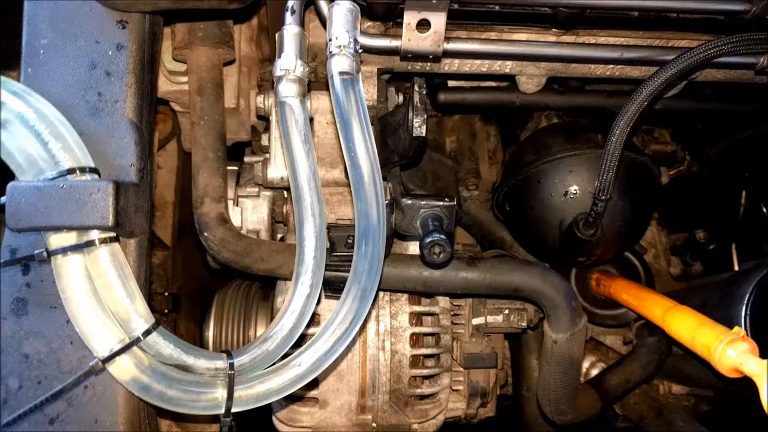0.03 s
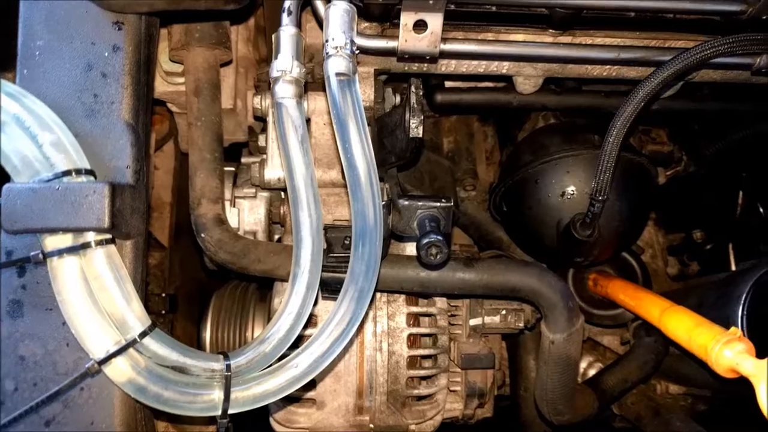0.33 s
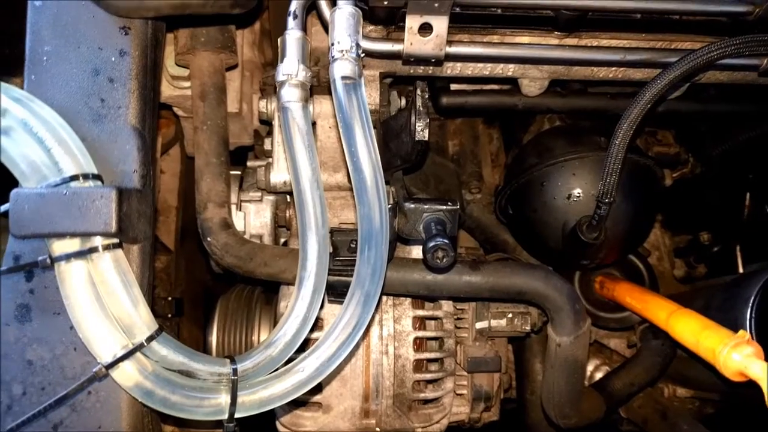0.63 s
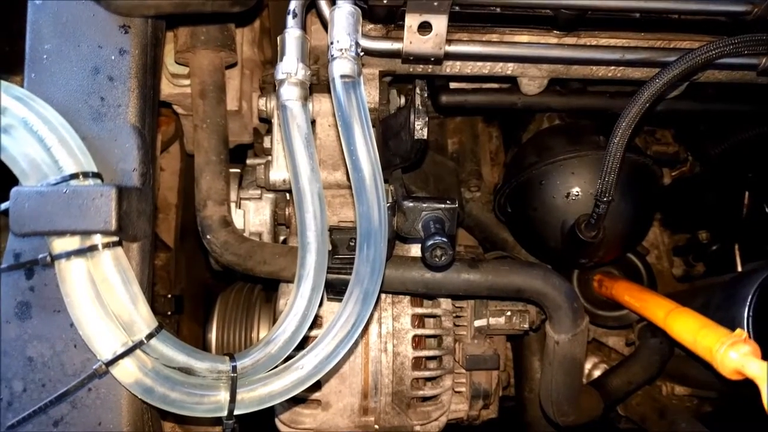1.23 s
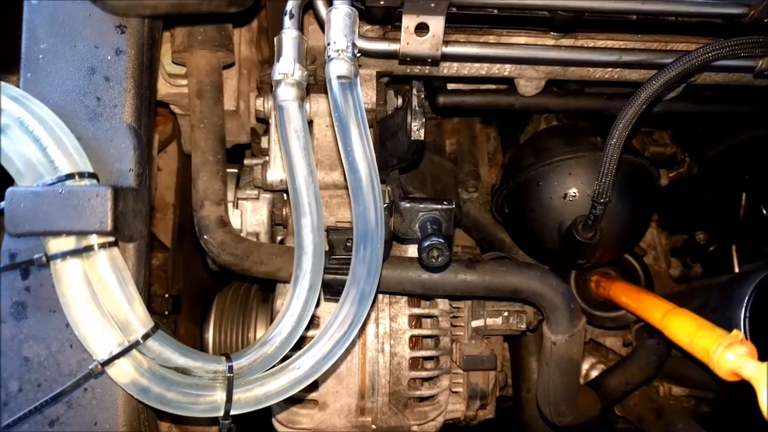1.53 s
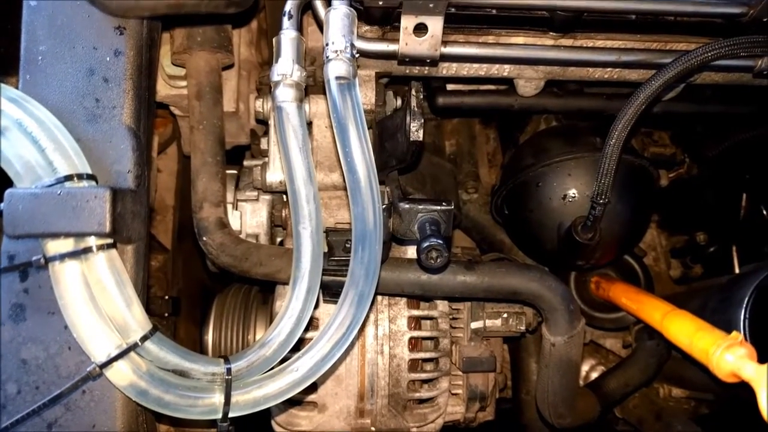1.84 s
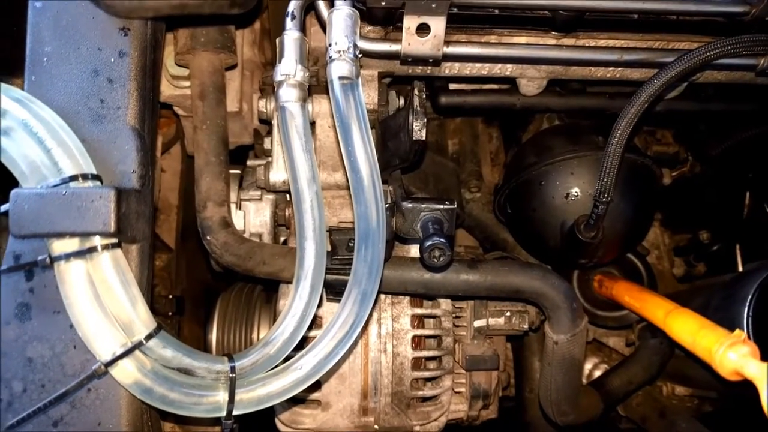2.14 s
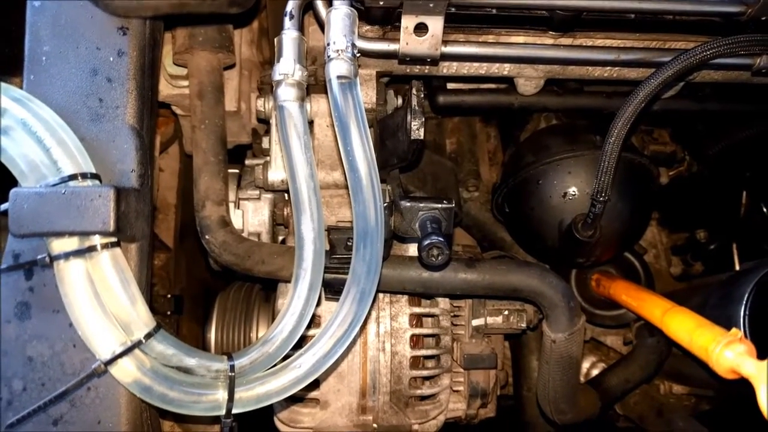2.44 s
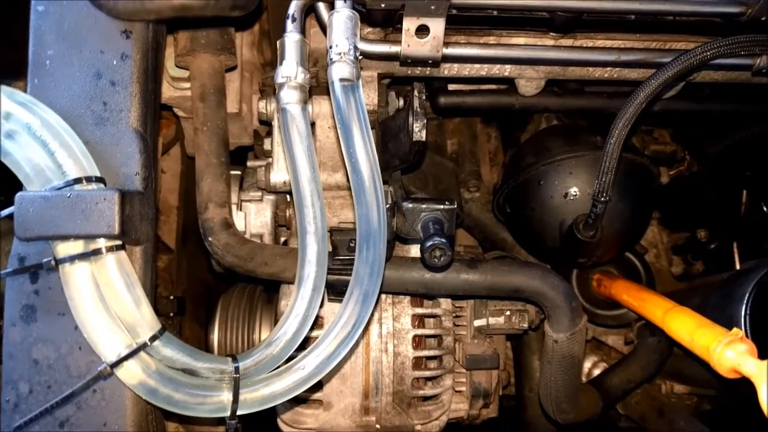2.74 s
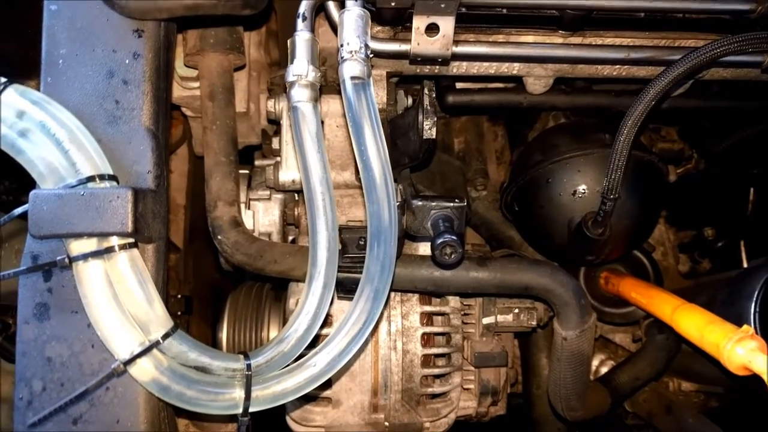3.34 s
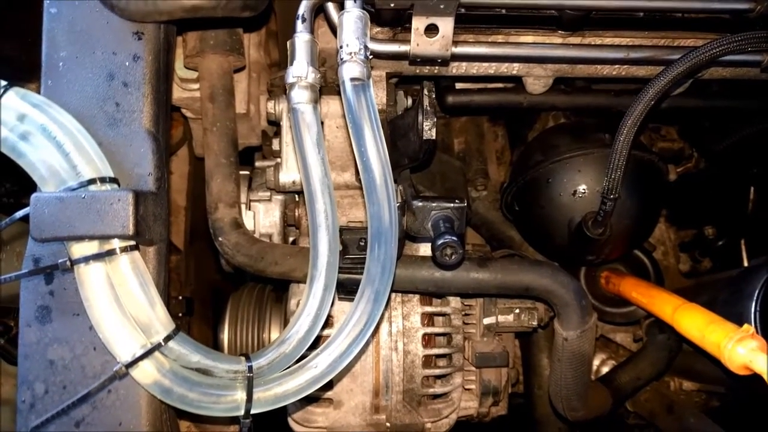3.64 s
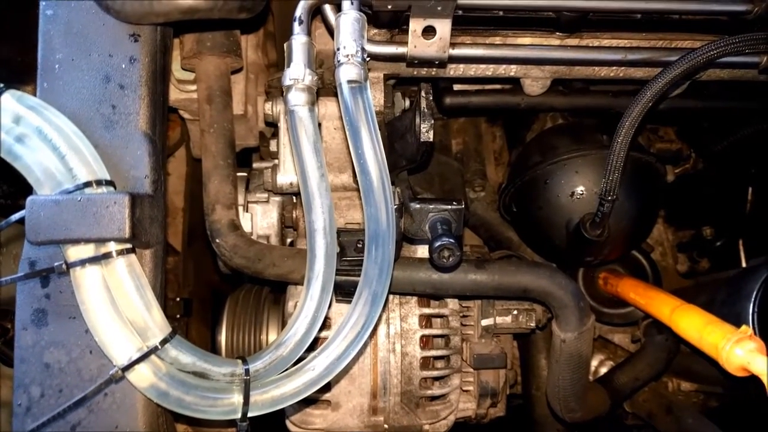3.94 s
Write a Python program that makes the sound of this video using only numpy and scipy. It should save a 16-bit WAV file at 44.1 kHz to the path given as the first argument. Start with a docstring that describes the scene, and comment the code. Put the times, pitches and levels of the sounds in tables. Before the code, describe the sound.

A diesel car engine idles, heard from close above the open engine bay. It fades in between about 0.15 and 0.5 seconds, then holds the same speed until the end at around 4 seconds. Hard, bright metallic knocks repeat evenly, about thirty a second, with fine gear and valve clatter and light hiss between them. Underneath run a low rumble and the soft, rhythmic gulping of the air intake.

```python
"""Hard diesel knock: a four-cylinder engine idles, heard from close above the open engine bay.
Each cylinder fires with its own knock, ringing through the block and steel parts near 7 kHz.
Gears and valves clatter in between; below lie piston shake, a thud per firing and the gulping intake.
The sound fades in and the loudest knocks overload the microphone."""
import sys
import numpy as np
from scipy import signal
from scipy.fft import rfft, irfft
from scipy.io import wavfile
from scipy.ndimage import uniform_filter1d

SR = 44100
rng = np.random.default_rng(int(sys.argv[2]) if len(sys.argv) > 2 else 0)


def persist_wave(psi):
    """Save psi, clipped to +-1, as 16-bit WAV."""
    counts = np.round(np.clip(psi, -1, 1) * 32767).astype(np.int16)
    wavfile.write(sys.argv[1], SR, np.atleast_2d(counts).T)


N = 176400
TIME = np.arange(N) / SR
FIRING_S, FIRINGS_PER_CYCLE = .0331845, 4
SWELL_CENTRE_S = .05


def knocks(times):
    """The cylinders fire in turn, each heard over its own path."""
    # in firing order: level/dB, slap delay/s, steel slap over ignition/dB, steel decay/s, crack/dB
    cylinders = [(-18, 0.0018, 10, 0.0035, -21), (-18, 0.00282, 8.5, 0.0052, -17),
                 (-17, 0.00245, -1.5, 0.0042, -13), (-20, 0.0012, -0.5, 0.0071, -9.5)]
    # resonances and hollows per path: f/Hz, width/Hz, gain/dB
    paths = [[(1214, 50, 6), (1410, 44, -9), (2310, 46, 4.5), (2440, 54, -5.4), (2648, 74, -5),
              (3090, 56, -1), (3466, 42, 7), (3940, 44, 5.5), (4177, 68, -6), (5420, 98, -9),
              (5792, 120, 9), (6740, 69, -4)], [(446, 56, -4), (1080, 150, 1), (1454, 91, 5), (1800, 86, -5.5), (2043, 36, 7),
                              (2100, 41, -11), (2330, 110, 5), (2660, 57, -6.1), (3143, 320, -6),
                              (3860, 45, 6), (4000, 46, -5), (5900, 50, 8)], [(610, 28, 6.5), (746, 50, -10.5), (1030, 39, -9),
                                              (2170, 43, -9), (2320, 65, 7), (2760, 140, 1), (3107, 54, 7),
                                              (3860, 91, -6.9), (4293, 52, 10), (4650, 47, 9.5),
                                              (5357, 58, 8), (6354, 270, 7)], [(432, 23, 5), (1270, 41, -3.6),
                                                              (1500, 74, 3.0), (1690, 46, -9),
                                                              (2440, 91, -7.2), (2710, 100, 6.5),
                                                              (3540, 140, 5), (4620, 60, 6.5),
                                                              (5070, 50, -10), (5780, 120, -1),
                                                              (6300, 72, -18), (7240, 200, -2.5)]]
    return sum(cylinder_knocks(times[k::FIRINGS_PER_CYCLE], cylinders[k], paths[k])
               for k in range(FIRINGS_PER_CYCLE))


def cylinder_knocks(times, cylinder, path, jitter_s=.00012, uneven_db=.9, steel_above_hz=5740):
    """One cylinder: ignition crack, dry rattle of the block, longer ring of the steel parts."""
    # spectrum common to all knocks: f/Hz, level/dB
    knock_spectrum = [(450, -19.5), (600, -19), (900, -16.5), (1100, -19.5), (1600, -17), (1900, -8),
                      (2130, -18.5), (2350, -15), (3000, -11.5), (4000, -16), (5300, -13.5), (6000, -11.5),
                      (6400, -6), (7250, 4), (7550, 1.9), (7900, -13), (8500, -21), (9500, -25.5),
                      (11500, -26), (14000, -24), (15600, -26)]
    level_db, slap_s, slap_db, decay_s, crack_db = cylinder
    chance = rng.standard_normal((len(times), 2))
    times = times + jitter_s * chance[:, 0]
    gains = from_db(uneven_db * chance[:, 1])
    block = knock_envelope(slap_s, slap_db=-1, decay_s=.0043, tail_db=-14)
    steel = knock_envelope(slap_s, slap_db, decay_s, tail_db=-4.5)
    hz = bins(block)
    path_db = sum(db * np.exp(-.5 * ((hz - f) / width) ** 2) for f, width, db in path)
    colour = from_db(at_hz(knock_spectrum, hz) + path_db)
    block_share = np.clip(1 / (1 + (hz / steel_above_hz) ** 20), .01, .99)
    ring = ringing(times, gains, block, colour * np.sqrt(block_share))
    ring += ringing(times, gains, steel, colour * np.sqrt(1 - block_share))
    return from_db(level_db) * rms_one(ring) + played(crack(), times, from_db(crack_db) * gains)


def knock_envelope(slap_s, slap_db, decay_s, tail_db, attack_s=.00053, tail_s=.012):
    """Ignition, then the main slap, both dying fast over a longer tail; powers add."""
    def blow(start_s, fall_s):
        age = np.maximum(TIME[:4096] - start_s, 0)
        return (1 - np.exp(-age / attack_s)) * np.exp(-age / fall_s)
    ignition = blow(0, decay_s)
    slap = from_db(slap_db) * blow(slap_s, decay_s)
    tail = from_db(tail_db) * blow(0, tail_s)
    return np.sqrt(ignition ** 2 + slap ** 2 + tail ** 2)


def ringing(times, gains, envelope, colour, bass_lag_s=.002977, lag_corner_hz=1001):
    """Metal ring, part repeated, part new; the heavy casting answers later than the thin steel."""
    # part new at each firing, before the cap: f/Hz, level re whole/dB
    fresh_spectrum = [(500, -6), (2000, -11), (7000, -8.5), (9500, -8), (15000, 3)]
    hz = bins(envelope)
    fresh = np.clip(from_db(at_hz(fresh_spectrum, hz)), 0, .95)
    lag = np.exp(-2j * np.pi * bass_lag_s * lag_corner_hz * np.arctan(hz / lag_corner_hz))
    same = coloured(rms_one(dense_ring(envelope)), colour * np.sqrt(1 - fresh ** 2))
    out = 0
    for start_s, gain in zip(times, gains):
        burst = rms_one(envelope * rng.standard_normal(len(envelope)))
        new = coloured(burst, colour * fresh)
        out = out + played(irfft(rfft(same + new) * lag), [start_s], [gain])
    return out


def dense_ring(envelope):
    """Overlapping modes as enveloped noise, evened out to a flat spectrum."""
    ring = envelope * rng.standard_normal(len(envelope))
    for _ in range(2):
        power = uniform_filter1d(np.abs(rfft(ring)) ** 2, size=15)
        ring = coloured(ring, power ** -.5)
    return ring


def crack(hz=3000, decay_s=.0005):
    """The ignition itself: a very short tone burst, peak 1."""
    t = TIME[:4096]
    burst = t * np.exp(-t / decay_s) * np.sin(2 * np.pi * hz * t)
    return burst / np.abs(burst).max()


def clunks(times):
    """The casting answers each ignition with a dull double clunk."""
    # casting pulses: delay/s, f/Hz, level/dB, sigma/s
    pulses = [(.0055, 663, -29.5, 0.00084), (.0096, 630, -36, 0.0008)]
    return sum(from_db(db) * played(swell(hz, sigma_s), times + delay_s - SWELL_CENTRE_S)
               for delay_s, hz, db, sigma_s in pulses)


def clatter(cycles, contact_db=-24, grain_db=2, hiss_db=-25.5, low_cut_hz=58):
    """Fine contacts of gears and valves repeat every cycle, over a steady hiss."""
    # gears and valves: f/Hz, level/dB
    clatter_spectrum = [(30, -39), (100, -10.0), (200, -4), (280, -9.0), (400, -6.5), (520, -12.5),
                        (650, -6.5), (1000, -9.5), (1500, -12.5), (1900, -14.5), (2150, -11), (3000, -14.5),
                        (4200, -11), (5600, -11.5), (6400, -5.5), (7000, 0), (7450, 0.0), (7900, -12.5),
                        (9000, -17.5), (11000, -22.5), (15500, -33)]
    size = int(FIRINGS_PER_CYCLE * FIRING_S * SR)
    grain = rms_one(uniform_filter1d(rng.standard_normal(size), size=40))
    one_cycle = rng.standard_normal(size) * from_db(-grain_db * grain)
    colour = from_db(at_hz(clatter_spectrum, bins(TIME)))
    contacts = from_db(contact_db) * rms_one(coloured(played(one_cycle, cycles), colour))
    hiss = from_db(hiss_db) * rms_one(coloured(rng.standard_normal(N), colour))
    return high_pass(contacts + hiss, low_cut_hz)


def rumble(crank, shake_db=-25.5, shake_lag_firings=.042, thud_lag_firings=.696):
    """The pistons shake the engine twice per firing; each firing adds a low thud."""
    # thud harmonics: f/firing rate, level/dB
    harmonics = [(3, -42), (4, -35.5), (5, -38.5), (6, -39), (7, -44)]
    shake = from_db(shake_db) * np.cos(4 * np.pi * (crank - shake_lag_firings))
    thud = sum(from_db(db) * np.cos(2 * np.pi * k * (crank - thud_lag_firings)) for k, db in harmonics)
    onset_db = np.interp(TIME, [.27, .28], [-7, 0])   # thin bass at first
    return np.sqrt(2) * (shake + thud) * from_db(onset_db)


def intake(cycles, jitter_s=.00025, uneven_db=.8):
    """The intake duct hoots in short swells of suction, one per cycle much stronger than the rest."""
    # gulps per cycle: t after first cylinder/s, f/Hz, level/dB, sigma/s
    gulps = [(-.0013, 370, -17, .0065), (0.0227, 350, -23.5, 0.0063), (0.036, 342.5, -27, 0.013),
             (0.061, 318, -33.5, 0.0062), (.099, 348, -23.5, .006), (0.1265, 352, -32.5, 0.0056)]
    # cycles of weak suction: t/s, gain/dB
    weak_cycles = [(.49, -2.5), (.89, -3), (1.95, -0.5), (2.09, -0.5), (2.62, -3), (3.41, -4.5),
                   (3.55, -2.5)]
    weak_db = sum(db * (np.abs(cycles - at_s) < 2 * FIRING_S) for at_s, db in weak_cycles)
    out = np.zeros(N)
    for delay_s, hz, db, sigma_s in gulps:
        chance = rng.standard_normal((len(cycles), 2))
        starts_s = cycles + delay_s - SWELL_CENTRE_S + jitter_s * chance[:, 0]
        gains = from_db(db + weak_db + uneven_db * chance[:, 1])
        out -= played(swell(hz, sigma_s), starts_s, gains)
    return out


def hum(crank):
    """Faint tones of the timing drive and accessories, geared to the crankshaft."""
    # drive tones: f/cycle rate, level/dB
    orders = [(44, -46.5), (56, -47), (76, -45), (85, -48), (92, -54), (104, -61), (120, -47)]
    cycle = crank / FIRINGS_PER_CYCLE
    tones = sum(from_db(db) * np.cos(2 * np.pi * (k * cycle + rng.random())) for k, db in orders)
    return np.sqrt(2) * tones


def top_hiss(level_db=-40, above_hz=9500):
    """Faint, steady high hiss above 9.5 kHz."""
    return from_db(level_db) * rms_one(high_pass(rng.standard_normal(N), above_hz))


def firings(knock_zero_s=.3618, hunt_s=.00062, hunt_period_s=2.9, most_late_at_s=2.22):
    """Number and time of each firing; the governor hunts slowly."""
    number = np.arange(-12, 116)
    even_s = knock_zero_s + FIRING_S * number
    return number, even_s + hunt_s * np.cos(2 * np.pi * (even_s - most_late_at_s) / hunt_period_s)


def swell(hz, sigma_s):
    """Tone under a Gaussian envelope."""
    t = TIME[:SR // 10] - SWELL_CENTRE_S
    return np.exp(-.5 * (t / sigma_s) ** 2) * np.cos(2 * np.pi * hz * t)


def played(sound, times, gains=1.):
    """The same sound started at each of the times."""
    out = np.zeros(N + 2 * SR)
    for start_s, gain in zip(times, np.broadcast_to(gains, len(times))):
        start = int(round(start_s * SR)) + SR
        out[start:start + len(sound)] += gain * sound
    return out[SR:SR + N]


def coloured(x, gain):
    """Minimum-phase filter, one gain per bin."""
    cepstrum = irfft(np.log(gain + 1e-9), len(x))
    cepstrum[1:len(x) // 2] *= 2
    cepstrum[len(x) // 2 + 1:] = 0
    return irfft(rfft(x) * np.exp(rfft(cepstrum)), len(x))


def at_hz(points, hz):
    """Level/dB of a spectrum table, interpolated over log frequency."""
    f, db = np.transpose(points)
    return np.interp(np.log(hz + 1e-9), np.log(f), db)


def high_pass(x, hz):
    return signal.sosfilt(signal.butter(2, hz, "high", fs=SR, output="sos"), x)


def bins(x):
    return np.fft.rfftfreq(len(x), 1 / SR)


def from_db(db):
    return 10 ** (np.asarray(db) / 20)


def rms_one(x):
    return x / np.sqrt(np.mean(x ** 2) + 1e-20)


def scene():
    """One crankshaft times the engine; mono."""
    number, times = firings()
    cycles = times[::FIRINGS_PER_CYCLE]
    crank = np.interp(TIME, times, number)   # position in firings
    knocking = knocks(times) + clunks(times)
    return (knocking + clatter(cycles) + intake(cycles) + rumble(crank) + hum(crank) + top_hiss())[None]


def record(dry):
    """Fade-in, flattened peaks, steep treble cut."""
    # fade-in: t/s, gain/dB
    fade = [(.146, -83), (.15, -23), (.165, -18), (.23, -11.5), (.3, -6), (.36, -3.5), (.42, -1.5)]
    ceiling, cutoff_hz = 1.12, 15800
    x = dry * from_db(np.interp(TIME, *np.transpose(fade)))
    x = x / (1 + (x / ceiling) ** 6) ** (1 / 6)
    low_pass = signal.ellip(12, .1, 70, cutoff_hz, fs=SR, output="sos")
    return np.clip(signal.sosfilt(low_pass, x), -1, 1)


dry = scene()
out = record(dry)
persist_wave(out)
```